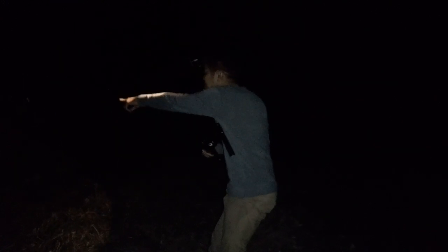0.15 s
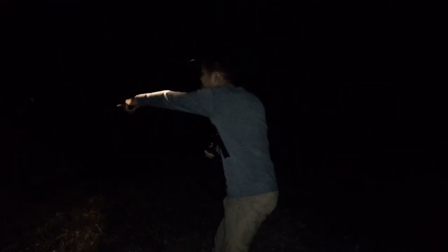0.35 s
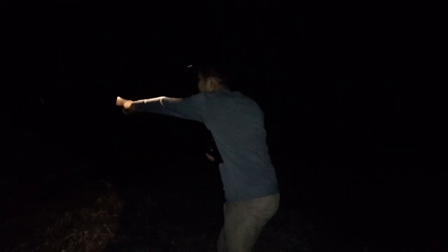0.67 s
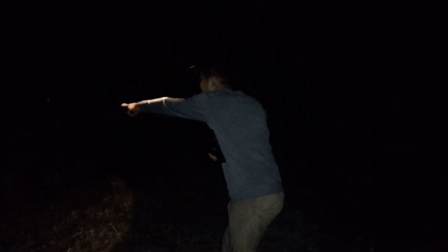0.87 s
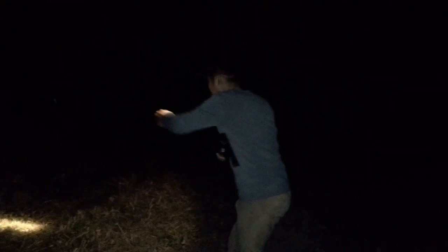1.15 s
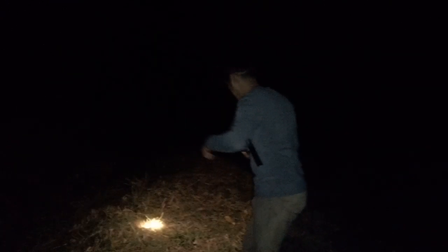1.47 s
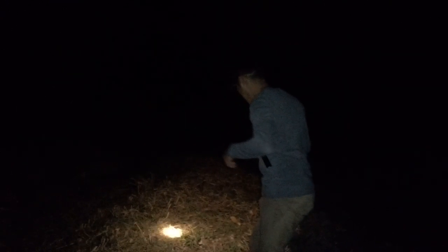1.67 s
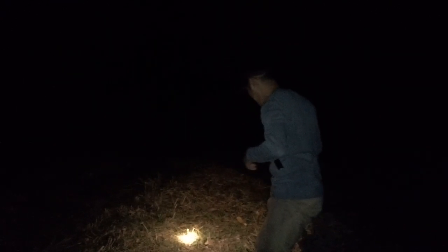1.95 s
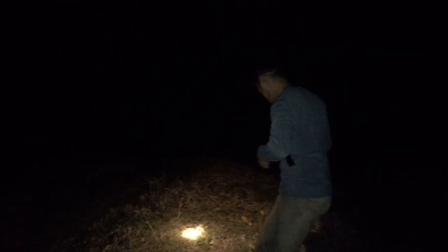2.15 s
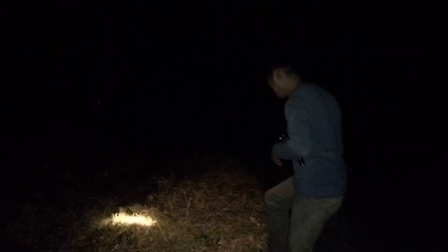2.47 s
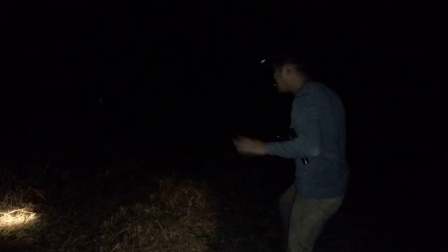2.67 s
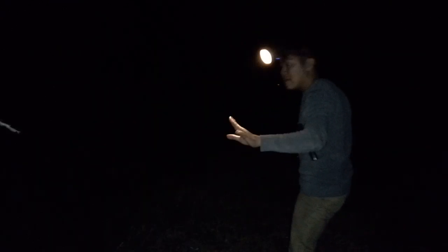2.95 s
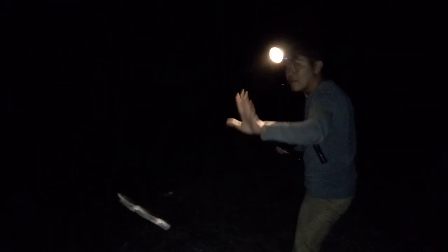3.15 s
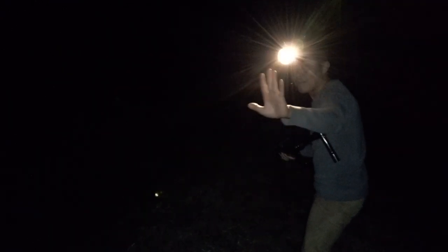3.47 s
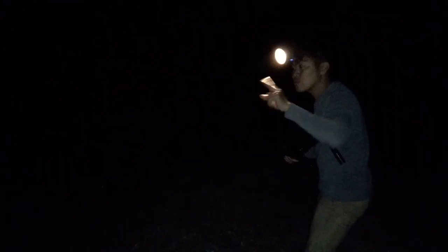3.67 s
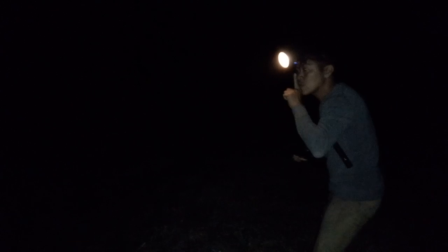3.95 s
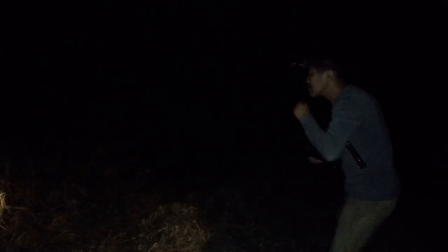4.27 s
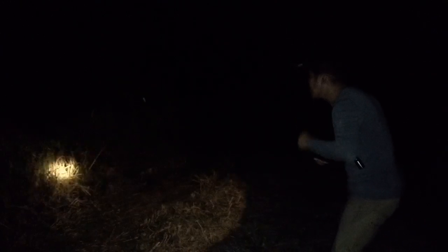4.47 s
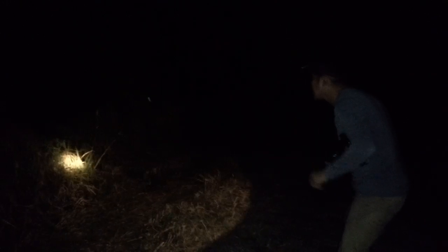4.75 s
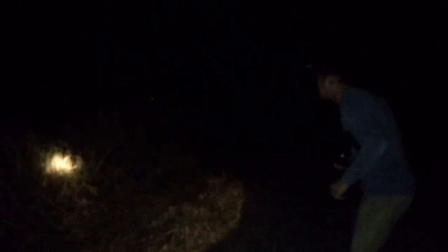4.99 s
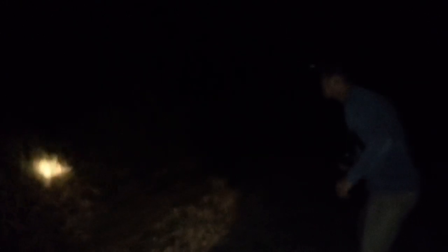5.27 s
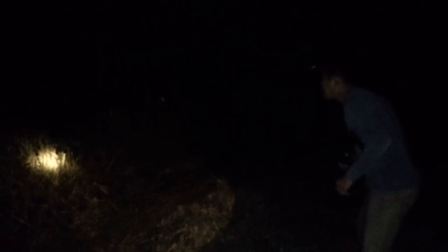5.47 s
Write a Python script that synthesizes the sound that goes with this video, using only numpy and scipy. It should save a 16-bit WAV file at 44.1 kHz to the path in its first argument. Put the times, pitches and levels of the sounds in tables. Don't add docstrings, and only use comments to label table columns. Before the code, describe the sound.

A mole cricket trills steadily over a night chorus of field crickets while slow steps rustle and crack dry grass.

```python
import sys
import numpy as np
from scipy import signal
from scipy.fft import rfft, irfft
from scipy.io import wavfile
from scipy.ndimage import uniform_filter1d

SR = 44100
rng = np.random.default_rng(int(sys.argv[2]) if len(sys.argv) > 2 else 0)


def to_wav(s):
    ch = np.atleast_2d(s).T
    pcm = np.round(np.clip(ch, -1, 1) * 32767)
    wavfile.write(sys.argv[1], SR, pcm.astype(np.int16))


def linear_from_db(decibels):
    return 10 ** (np.asarray(decibels, float) / 20)


N = 247842


def read(points, hz):
    f, value = np.transpose(points)
    return np.interp(np.log(hz + 1), np.log(f + 1), value)


def curve(rows, order):
    return np.interp(np.arange(N) / SR, *np.transpose(rows)[[0, order]])


def moments(rows, half_s):
    t = np.arange(0, N, 64) / SR
    total_db = sum(db * np.exp(-((t - s) / half_s) ** 2) for s, db in rows)
    return np.interp(np.arange(N) / SR, t, total_db)


def evened(x):
    return x / np.sqrt(np.mean(x ** 2) + 1e-20)


def coloured(x, points):
    gain = linear_from_db(read(points, np.fft.rfftfreq(N, 1 / SR)))
    return evened(irfft(rfft(x) * gain, N))


def drift(rate_hz):
    hz = np.arange(1000) * SR / N
    a, b = rng.standard_normal((2, len(hz)))
    spectrum = (a + 1j * b) * np.exp(-(hz / rate_hz) ** 2) * (hz > 0)
    coarse = evened(irfft(spectrum, 8192))
    return np.interp(np.arange(N) * len(coarse) / N, np.arange(len(coarse)), coarse)


def following(x, level_db, span):
    power = uniform_filter1d(uniform_filter1d(x ** 2, int(span)), int(span))
    return linear_from_db(level_db) * x / np.sqrt(abs(power) + 1e-3)


def field(x, wet, t60):
    t = np.arange(SR // 2) / SR
    noise = rng.standard_normal(len(t))
    fade = linear_from_db(-60 * t / t60)
    turn = np.pi * 1.3 * np.arange(N) / SR
    tails = [noise * fade, noise[::-1] * fade, np.roll(noise, SR // 6) * fade]
    far = np.zeros(N)
    for k, tail in enumerate(tails):
        share = np.cos(turn + k * np.pi / 3) ** 2
        far += signal.fftconvolve(x * share, tail)[:N]
    far = np.interp(np.arange(N) + 60 * np.sin(turn), np.arange(N), far)
    return evened(evened(x) + wet * evened(far))


def triller():
    # (time [s], level [dB])
    trill_level = [(0.0, -40.5), (0.51, -39.5), (1.02, -41.5), (1.53, -42), (2.04, -42.5), (2.55, -44),
                   (3.07, -41.5), (3.58, -38.5), (4.09, -41.5), (4.6, -41.5), (5.11, -41), (5.62, -43.5)]
    # (multiple of the stroke rate [1], level [dB])
    burrow = [(13, -33.5), (14, -18), (15, -24), (16, -10), (17, 1), (18, 10.5), (19, -7), (20, -20)]
    # (time [s], level [dB])
    close_level = [(0, -5), (.6, -4), (.95, -1), (1.35, 0), (1.8, -4), (2.6, -6), (3.2, -5), (3.55, 0),
                   (4.15, 0), (4.5, -4), (5, -3), (5.62, -5)]
    # (frequency [Hz], level [dB])
    near_colour = [(1700, -100), (1880, -29), (1940, -14), (1975, -6), (2020, -4.5), (2062, -3.5),
                   (2095, -1.5), (2130, 0), (2185, -1), (2230, -12), (2300, -26.5), (2500, -100)]
    # (time [s], level [dB])
    lulls = [(0.324, -1.5), (0.839, -2), (1.059, -4), (1.128, -2.5), (1.254, -3.5), (1.35, -7),
             (1.474, -1.5), (1.58, -4), (1.809, -1.5), (2.041, -3), (2.508, -1.5), (2.771, -3), (3.036, -1),
             (3.511, -4.5), (3.63, -3.5), (3.741, -3), (3.857, -1.5), (3.982, -3), (4.197, -5), (4.454, -2),
             (4.516, -2.5), (4.954, -4.8), (5.04, -5.5), (5.148, -5.5), (5.227, -2.5), (5.305, -6.5),
             (5.373, -4), (5.441, -3)]
    # (time [s], level [dB])
    catches = [
        (1.12, -10),
        (3.771, -14),
        (3.865, -8),
        (4.445, -1),
        (4.6, -11),
        (4.738, -6),
    ]
    surges = [.45, .65, .92, 1.19, 1.75, 1.91, 2.36, 2.69, 2.98, 3.1, 3.8, 3.9, 4.07, 4.62, 4.87, 5.5]
    wing_hz, stroke_lead = 117.36, 0.366
    ring_wander_hz, loose_db = 4.0, -7
    evenness = 0.42

    turns = wing_hz * np.arange(N) / SR + stroke_lead
    wander = np.cumsum(drift(13.4)) / SR
    tones = []
    for k, db in burrow:
        tone_db = db + 1.5 * drift(11) * (k != 18)
        tones.append(linear_from_db(tone_db) * np.exp(2j * np.pi * k * turns))

    close = linear_from_db(curve(close_level, order=1))
    ring = np.exp(2j * np.pi * ring_wander_hz * wander) + close * in_step()
    ring = ring / (abs(ring) + 0.1) ** evenness
    group = evened((sum(tones[3:]) * ring).real)
    group = group + close * linear_from_db(loose_db) * neighbours(near_colour, 116.9, 121.3, 0.75, 2.5, count=5)

    low = sum(tones[:3]) * np.exp(2j * np.pi * 2.8 * wander[::-1])
    throbbing = linear_from_db(effort(order=1) + 12.5) * low.real
    level_db = curve(trill_level, order=1) - 0.1
    level_db = level_db + moments(lulls, 0.03) + moments(catches, 0.0068)
    level_db = level_db + moments([(s, 2.5) for s in surges], 0.021)
    return following(group, level_db, 1300) + throbbing


def in_step():
    # (distance from the triller's pitch [Hz], level [dB])
    offsets = [(-21, -9), (-11, -4), (10, -2), (21, -6), (33, -7.5), (46, -9), (64, -12)]
    out = np.zeros(N, complex)
    for hz, db in offsets:
        phase = np.cumsum(hz + 4.0 * drift(5)) / SR + rng.random()
        out += linear_from_db(db + 2.5 * drift(5.6)) * np.exp(2j * np.pi * phase)
    return out / np.linalg.norm(linear_from_db(np.transpose(offsets)[1]))


def neighbours(colour, low_hz, high_hz, wobble_hz, depth_db, count):
    out = np.zeros(N)
    for k in range(count):
        stroke_hz = low_hz + (high_hz - low_hz) * (k / count) ** 2.1 + wobble_hz * drift(5)
        strokes = np.diff(np.floor(np.cumsum(stroke_hz) / SR + rng.random()), prepend=0)
        out += strokes * linear_from_db(depth_db * drift(5.6))
    return coloured(out, colour)


def effort(order):
    # (peak time [s], low-voiced level [dB], high-voiced level [dB])
    throbs = [(0, -53, -52.5), (0.23, -52.5, -53.5), (0.48, -53, -57), (0.72, -52.5, -51.5),
              (0.99, -52, -51), (1.24, -52.6, -49), (1.46, -53.1, -56), (1.7, -52, -55), (1.94, -52, -56),
              (2.19, -52, -54.5), (2.41, -50.3, -54), (2.67, -49, -53.5), (2.91, -51, -56),
              (3.16, -50, -54.5), (3.38, -54.5, -54), (3.6, -54.5, -50.5), (3.82, -56.5, -48.5),
              (4.09, -54, -52), (4.35, -52.5, -52.5), (4.59, -54.5, -50.5), (4.84, -53, -51),
              (5.07, -52.5, -51), (5.32, -52, -49), (5.59, -51, -51)]
    half_s = 0.12
    t = np.arange(0, N, 64) / SR
    power = sum(linear_from_db(row[order] * 2) * np.exp(-2 * ((t - row[0]) / half_s) ** 2) for row in throbs)
    return np.interp(np.arange(N) / SR, t, 10 * np.log10(power))


def crowd():
    # (frequency [Hz], level [dB])
    low_colour = [(1200, -100), (1400, -22), (1450, -11), (1500, -8), (1540, -1), (1590, -10), (1640, -4),
                  (1700, -12), (1780, -11), (1840, 0), (1880, -2), (1915, -11), (1960, -7), (2010, -30),
                  (2200, -100)]
    # (frequency [Hz], level [dB])
    high_colour = [(2000, -100), (2170, -8), (2230, 0), (2300, -3), (2420, -2), (2490, -20), (2590, -17),
                   (2670, -30), (2900, -100)]
    low = neighbours(low_colour, 107, 121, 2.5, 0.79, count=14)
    high = neighbours(high_colour, 107, 124, 2.5, 1.4, count=14)
    return following(low, effort(order=1) - 1, 2600) + following(high, effort(order=2) - 0.7, 2800)


def crickets(level_db, band, stroke_hz, chirp_hz, glide_hz, count):
    t, out, unsteady = np.arange(N) / SR, np.zeros(N), drift(40)
    sway = 44.94 * drift(3.5)
    for hz in np.linspace(band[1][0], band[-2][0], count):
        a, b, c, d = rng.random(4)
        own = np.roll(unsteady, int(b * N))
        stroke = (t * stroke_hz * (0.9 + 0.2 * a) + b) % 1
        beat = np.sin(np.float32(2 * np.pi * (t * chirp_hz * (0.7 + 0.6 * c) + d)))
        chirp = np.clip(0.19 + 4.5 * beat, 0, 1)
        pip = np.sin(np.float32(np.pi * np.clip(stroke / 0.63, 0, 1))) ** 2
        pitch_hz = hz + 0.5 * sway + np.roll(sway, int(d * N)) + glide_hz * (0.3 - stroke) + 40 * own
        tone = np.cos(2 * np.pi * np.cumsum(pitch_hz) / SR)
        out += linear_from_db(read(band, hz)) * chirp * pip * tone
    return following(field(out, 0.67, 1.0), uniform_filter1d(level_db, size=1500), 5600)


def lower_choir():
    # (time [s], level [dB])
    loudness = [(0, -61), (.8, -58), (1.1, -60.5), (1.4, -59.5), (2, -62), (2.9, -59.5), (3.7, -58.5),
                (3.95, -61.5), (5.62, -59)]
    # (time [s], level [dB])
    hushes = [
        (.59, -6.5),
        (1.05, -6.5),
        (1.85, -2.5),
        (2.0, -4),
        (2.26, -2),
        (2.96, -2),
        (3.44, 0),
        (3.87, -7.5),
        (4.2, -1),
        (5.15, -3),
    ]
    # (frequency [Hz], level [dB])
    band = [(2700, -30), (2850, -26.5), (3050, -7.5), (3300, 8), (3500, 0), (3650, -30.5), (3800, -35)]
    return crickets(curve(loudness, order=1) + moments(hushes, 0.027), band, 19.5, 2.2, 400, count=26)


def deep_chirps():
    chirp_hz, start_s, throb_db = 3.0, -0.03, 11.5
    rise, apart_s = 0.22, 4.3
    t = np.arange(N) / SR
    share = (chirp_hz * (t - start_s)) % 1
    trail = np.clip((share - rise) / (1 - rise), 0, 1) ** 2.5
    ebb = np.maximum(1 - share / rise, trail)
    return -61 - throb_db * ebb * np.where(t < apart_s, 1, 0.4) - 1.3 * (t > apart_s)


def upper_choir():
    # (frequency [Hz], level [dB])
    band = [(4800, -30), (4950, -37.5), (5230, -12), (5400, -5.5), (5550, -13.5), (5700, -30)]
    return crickets(deep_chirps(), band, 30, 3.2, 400, count=14)


def throb(rate_hz, peak_s, depth_db):
    return -depth_db * np.sin(np.pi * rate_hz * (np.arange(N) / SR - peak_s)) ** 4


def shrill_choirs():
    # (time [s], slow choir level [dB], quick choir level [dB])
    loudness = [(0, -62, -68.5), (.6, -59.5, -67.5), (1.2, -61.5, -62.5), (1.8, -61.5, -61.5),
                (2.6, -59, -64.5), (3.4, -62.5, -62.5), (4.1, -63, -61.5), (4.5, -61, -62),
                (5, -67.5, -57.5), (5.62, -57.5, -58)]
    # (frequency [Hz], level [dB])
    band = [(5250, -30), (5480, -5), (5750, -2), (5980, 0), (6080, -19.5), (6200, -35)]
    slow = linear_from_db(curve(loudness, order=1) + throb(3.34, 0.3, 7.5))
    quick = linear_from_db(curve(loudness, order=2) + throb(4.16, 0.13, 7.5))
    return crickets(20 * np.log10(np.hypot(slow, quick)), band, 32, 3.8, 400, count=18)


def lone_cricket():
    # (start time [s], wing strokes [count], peak level [dB])
    chirps = [
        (.277, 3, -68),
        (.699, 3, -67),
        (1.197, 3, -70),
        (1.984, 2, -69),
        (2.823, 3, -67),
        (3.262, 2, -69),
        (4.521, 3, -65),
        (4.946, 3, -61),
        (5.364, 3, -61),
    ]
    stroke_s, edge_stroke_db = 0.0353, -1.5
    t, train = np.arange(800) / SR, np.zeros(N)
    for s, strokes, peak_db in chirps:
        k = np.arange(strokes)
        at = ((s + k * stroke_s) * SR).astype(int) - 250
        train[at] = linear_from_db(peak_db + 3.5 + edge_stroke_db * (k != 1))
    pip = np.hanning(len(t)) * np.sin(2 * np.pi * (6730 * t - 3500 * t ** 2))
    near = signal.fftconvolve(train, pip)[:N]
    return np.sqrt(np.mean(near ** 2)) * field(near, 0.25, 0.22)


def snaps():
    # (time [s], peak level [dB], pitch [Hz], low knock level [dB])
    cracks = [(0.019, -69, 10040, 0), (0.0577, -56, 9800, -20.5), (1.366, -63, 9900, -18),
              (1.4154, -66, 9770, -12), (1.4651, -66, 10100, -6), (1.601, -63, 9870, -18.5),
              (1.625, -44, 7370, -10), (1.644, -58, 7480, -10), (1.7193, -57.5, 6750, -8),
              (2.515, -54.5, 14300, -2), (2.577, -59, 9300, -9), (2.7906, -73, 14300, -6),
              (2.858, -51, 13950, -24), (2.881, -57.5, 13540, -14), (2.9247, -68, 9690, -9),
              (3.138, -53, 9600, -14), (3.3809, -46, 12130, -30.5), (3.7513, -61, 8500, -20),
              (3.9669, -57, 14500, -19), (4.148, -56, 10150, -10), (4.2455, -43, 9700, -2),
              (4.2543, -47, 10400, 4), (4.401, -51.5, 11940, -29), (4.8968, -54, 10040, -13),
              (5.0464, -69, 9360, -12), (5.2443, -66, 7660, -8), (5.375, -59, 7540, -16),
              (5.387, -63.5, 10050, -14), (5.4394, -66, 7550, -2)]
    t, out = (np.arange(1800) - 600) / SR, np.zeros(N + 1800)
    u = t - 4e-4
    hiss = uniform_filter1d(rng.standard_normal((len(cracks), 1800)), size=14, axis=1)
    for (s, peak_db, hz, low_db), noise in zip(cracks, hiss):
        shape = np.exp(-(u / 0.00049) ** 2) + 0.63 * noise * np.exp(-abs(u) / 0.0031)
        ring = np.sin(2 * np.pi * hz * t) * shape
        knock = linear_from_db(low_db) * np.sin(2 * np.pi * 4800 * t) * np.exp(-(u / 0.00032) ** 2)
        tick_db = -68 + 0.35 * (peak_db + 58.0)
        tick = linear_from_db(tick_db - peak_db) * np.sin(2 * np.pi * 13000 * u) * np.exp(-(u / 6e-5) ** 2)
        out[round(s * SR):][:1800] += linear_from_db(peak_db + 0.9) * (ring + knock + tick)
    return out[600:N + 600]


def rustle():
    # (time [s], half length [s], body level [dB], airy top level [dB])
    brushes = [(0.06, 0.05, -78, -81.5), (0.555, 0.044, -91, -80.5), (1.46, 0.22, -81, -85),
               (1.635, 0.022, -68.5, -84), (2.015, 0.082, -81, -84), (2.182, 0.036, -69, -66),
               (2.374, 0.046, -79, -75.5), (2.497, 0.043, -72.5, -73.5), (2.569, 0.074, -73.5, -80),
               (2.723, 0.91, -82, -89), (2.838, 0.067, -86, -75.5), (3.005, 0.058, -81, -82),
               (3.14, 0.056, -75, -76), (3.249, 0.049, -81, -83), (3.401, 0.028, -79.5, -75.5),
               (3.522, .06, -78.5, -88), (3.669, 0.1, -77, -85), (3.758, .02, -74, -74.5),
               (4.907, 0.044, -74.5, -90), (5.013, .08, -81.5, -85), (5.383, 0.025, -77.5, -85.5),
               (5.525, 0.17, -78, -86.5)]
    # (frequency [Hz], level [dB])
    grass_colour = [(2000, -81), (3000, -24.5), (4300, -0.5), (6800, 6), (7600, -4), (8400, -32.5),
                    (9800, -9.5), (11500, -12.5), (13500, -17.5), (15800, -5.5), (17000, -66.5)]
    # (frequency [Hz], level [dB])
    top_colour = [(11000, -81), (13000, -26.5), (14000, -10), (14800, 0.5), (15400, 0.5), (15900, -3.5),
                  (16600, -64.5)]
    t, blades = np.arange(140) / SR, rng.standard_normal(N)
    clumps = linear_from_db(2 * drift(25))
    for hz in np.geomspace(8500, 15500, 14):
        sizes = linear_from_db(3 * np.minimum(rng.exponential(1, N), 4))
        sizes = sizes * (rng.random(N) < 120 * clumps / SR)
        crackle = np.hanning(140) * np.sin(2 * np.pi * hz * t)
        blades += 0.28 * evened(np.convolve(sizes, crackle)[:N])

    clock = np.arange(N) / SR
    body = np.zeros(N)
    top = np.full(N, linear_from_db(-81.0)) * linear_from_db(1.8 * drift(14))
    for s, half, body_db, top_db in brushes:
        swell = np.exp(-((clock - s) / half) ** 2)
        body = np.hypot(body, linear_from_db(body_db) * swell)
        top = np.hypot(top, linear_from_db(top_db) * swell)
    air = rng.standard_normal(N) + 0.3 * evened(blades)
    return linear_from_db(6.5) * body * coloured(blades, grass_colour) + top * coloured(air, top_colour)


def swelling_tones(rows):
    out = np.zeros(N + SR)
    for s, half, db, hz in rows:
        t = np.arange(-3 * half, 3 * half, 1 / SR)
        tone = np.exp(-(t / half) ** 2) * np.cos(2 * np.pi * hz * t)
        out[round((s - 3 * half) * SR):][:len(t)] += linear_from_db(db) * tone
    return out[:N]


def stem_taps():
    # (time [s], peak level [dB], pitch [Hz])
    taps = [(0.0179, -56, 3890), (2.3421, -64, 4360), (2.5172, -59, 4900), (3.1378, -59, 4190),
            (3.3997, -64, 4190), (3.5493, -54, 4630), (3.6336, -62, 4340), (3.7065, -61, 4590),
            (3.8003, -58, 3830), (4.373, -53, 4030), (4.8963, -56, 4400), (5.436, -58, 4750),
            (4.156, -54, 10000), (4.2459, -44, 12300), (4.2459, -48, 15200), (4.2547, -43, 12100),
            (4.2655, -54, 10200), (4.386, -56, 15000)]
    # (time [s], peak level [dB], pitch [Hz])
    blade_ticks = [(1.9562, -67, 9640), (1.9941, -64, 9140), (2.026, -65, 10900), (2.044, -67, 10900),
                   (2.1662, -62, 11000), (2.1747, -54, 10400), (2.3014, -63, 10700), (2.3847, -73, 10900),
                   (2.576, -59, 9500), (2.6222, -65, 9990), (2.7913, -71, 9610), (2.8567, -62, 10400),
                   (2.927, -69, 9640), (2.9948, -68, 9710), (3.0537, -69, 10300), (3.1375, -58, 9930),
                   (3.1949, -70, 9260), (3.2138, -69, 9910)]
    stems = [(s, 0.0006, db - 8, hz) for s, db, hz in taps]
    blades = [(s + 0.001, 0.0011, db - 4, hz) for s, db, hz in blade_ticks]
    return swelling_tones(stems + blades)


def footfalls():
    # (peak time [s], half length [s], peak level [dB], pitch [Hz])
    bumps = [(.19, .025, -67, 130), (.45, .03, -68, 75), (0.849, .03, -75, 76), (1.065, 0.028, -64.5, 72),
             (1.19, .03, -70, 75), (1.73, .025, -68.5, 73), (1.86, .03, -66.5, 85), (2.111, .045, -68, 66),
             (2.372, 0.023, -66, 110), (2.459, .03, -71, 78), (2.565, .025, -66, 70), (2.651, .05, -66, 68),
             (2.9, 0.018, -67, 75), (2.965, .025, -66, 157), (3.02, 0.018, -68, 150), (3.17, .03, -71, 80),
             (3.339, .03, -70.5, 215), (3.541, .03, -72, 80), (3.639, .03, -71.5, 219),
             (3.802, 0.064, -64, 78), (3.969, .025, -67, 80), (4.85, .025, -73, 220), (5.17, .045, -67, 66),
             (5.5, .025, -71, 75)]
    return swelling_tones(bumps)


def peeps():
    # (peak time [s], half length [s], peak level [dB], pitch [Hz])
    far_chirps = [(.15, .025, -74, 5000), (0.238, .03, -78, 4720), (.33, .025, -76, 5000),
                  (.54, .025, -75, 6400), (.61, .025, -76, 4980), (.85, .03, -76.5, 4720),
                  (1.116, .035, -76, 4990), (1.5, .03, -76, 4700), (1.86, .04, -75, 4720),
                  (2.202, .03, -76, 4400), (2.45, .03, -79, 4570), (3.08, .04, -78, 4370),
                  (3.3, .04, -78, 4350), (3.52, .05, -75, 4350), (3.65, .03, -77, 4350),
                  (.7, .06, -83, 970), (1.998, .06, -82, 970), (2.897, .06, -86, 974),
                  (3.298, .03, -79, 640), (3.828, .03, -76, 650), (4.5, .06, -80, 970),
                  (5.3, .05, -84, 960), (3.66, .02, -69, 360), (5.054, .025, -72, 375),
                  (5.421, .025, -69, 420)]
    return swelling_tones(far_chirps)


def croaks():
    # (peak time [s], half length [s], level [dB], pitch [Hz])
    calls = [
        (0.62, 0.035, -73, 310),
        (1.796, 0.03, -65.5, 320),
        (1.897, 0.024, -67, 304),
        (2.367, 0.026, -74, 230),
        (2.832, 0.038, -68.5, 314),
        (3.62, 0.033, -70.5, 401),
        (4.864, 0.024, -68.5, 340),
        (5.235, 0.06, -68.5, 424),
        (5.302, 0.024, -73, 298),
    ]
    t, out = np.arange(N) / SR, np.zeros(N)
    for s, half, db, hz in calls:
        swell = np.exp(-((t - s) / half) ** 2)
        out += linear_from_db(db + 9) * swell * (0.51 + 0.47 * drift(45)) * np.sin(2 * np.pi * hz * t)
    return out


def strays():
    # (time [s], level [dB])
    joins = [(.8, 10), (1.47, 11), (2.3, 6.5), (2.75, 7), (2.93, 12), (3.55, 7), (3.72, 6), (4.08, 10),
             (4.27, 13), (4.72, 8), (4.9, 13), (5.5, 14)]
    # (frequency [Hz], level [dB])
    band = [(2650, -30), (2780, -2.5), (2880, -1.5), (3000, -3), (3100, -30)]
    return crickets(-80.5 + moments(joins, 0.07), band, 20, 2.9, 300, count=3)


def thin_singers():
    # (time [s], level [dB])
    loudness = [(0, -79), (.3, -79), (.7, -86), (1.3, -78), (1.8, -78), (2.4, -76), (3, -81), (3.5, -75),
                (4.1, -83.5), (4.9, -78.5), (5.62, -73)]
    # (frequency [Hz], level [dB])
    band = [(6150, -30), (6260, -0.5), (6340, 2), (6420, -30)]
    return crickets(curve(loudness, order=1), band, 30, 3, 100, count=2)


def floor():
    # (frequency [Hz], level [dB])
    floor_colour = [(15, -31), (31, -20), (50, -7), (72, 0.5), (85, -2), (250, -8.5), (380, -5), (480, -12),
                    (900, -17.5), (1350, -15), (2700, -19.5), (4300, -23), (6900, -22), (8300, -34.5),
                    (10000, -34), (13000, -35.5)]
    # (time [s], level [dB])
    gusts = [
        (.2, 1.5),
        (1.07, 2),
        (1.75, 2),
        (2.12, 3),
        (2.57, -1),
        (2.98, 4),
        (3.8, 6),
        (5.17, 0),
    ]
    noise = coloured(rng.standard_normal(N), floor_colour)
    bass = signal.sosfiltfilt(signal.butter(2, 500, fs=SR, output="sos"), noise)
    breeze = linear_from_db(-73 + moments(gusts, 0.05)) * linear_from_db(1.5 * drift(12)) * evened(bass)
    return breeze + linear_from_db(-65.5 + 1.3 * drift(13.0)) * (noise - bass)


def scene():
    mole_crickets = triller() + crowd()
    field_crickets = lower_choir() + upper_choir() + shrill_choirs() + lone_cricket()
    steps = snaps() + rustle() + stem_taps() + footfalls()
    far = peeps() + croaks() + strays() + thin_singers() + floor()
    return (mole_crickets + field_crickets + steps + far)[None]


def low_pass(x):
    return signal.sosfilt(signal.butter(12, 16770, fs=SR, output="sos"), x)


def record(dry):
    headroom, edge_hz = 0.058, 15830
    rounded = headroom * np.tanh(dry / headroom)
    hz = np.fft.rfftfreq(N, 1 / SR)
    mix = irfft(rfft(rounded) * (hz < edge_hz), N)
    return low_pass(mix)


dry = scene()
out = record(dry)
to_wav(out)
```